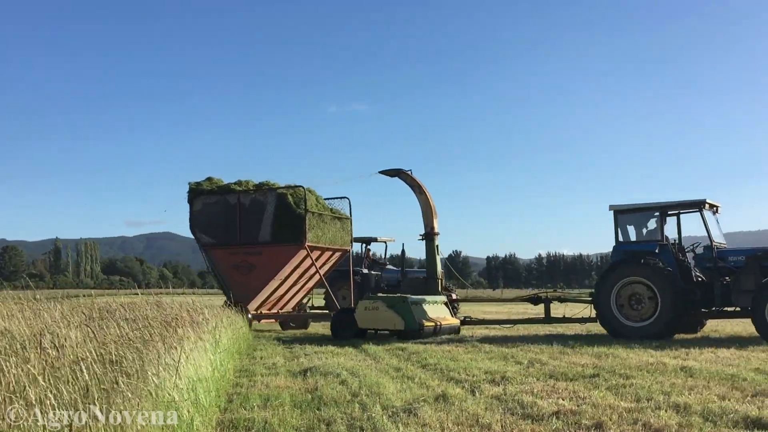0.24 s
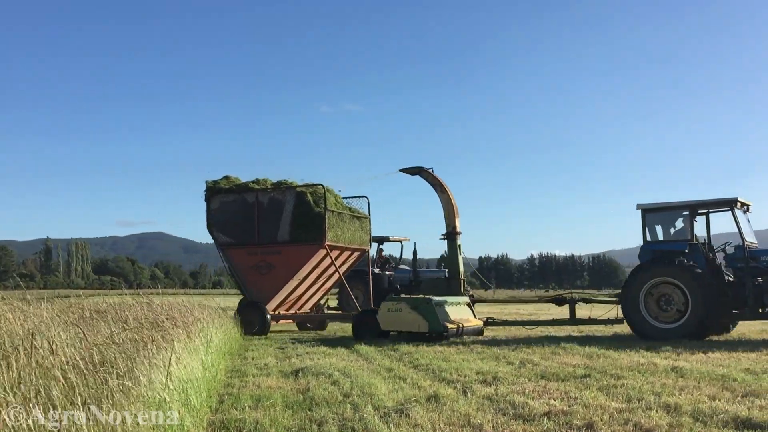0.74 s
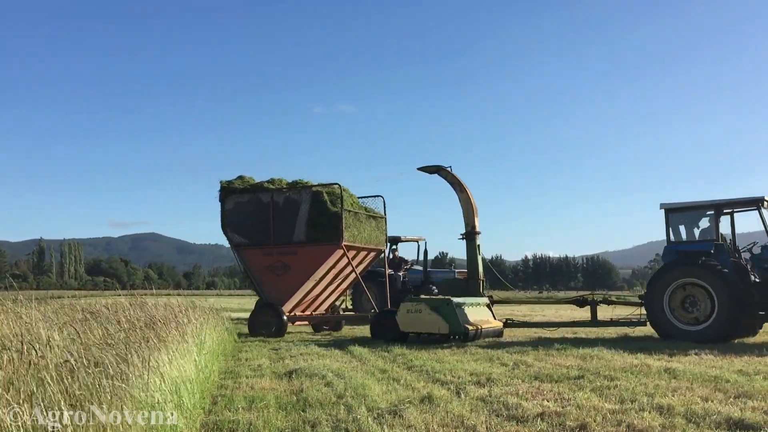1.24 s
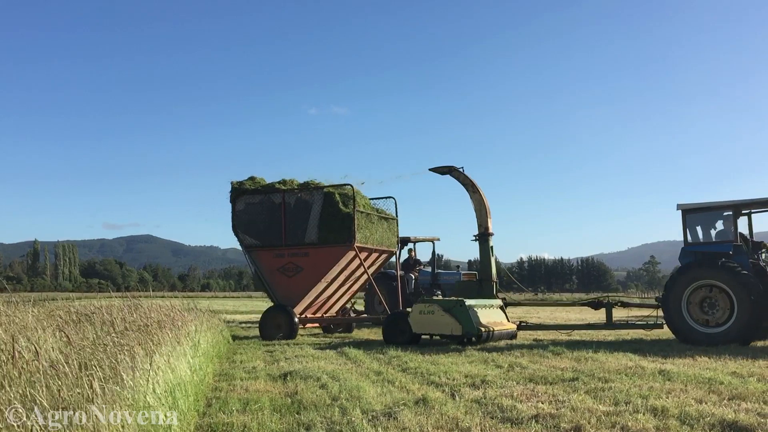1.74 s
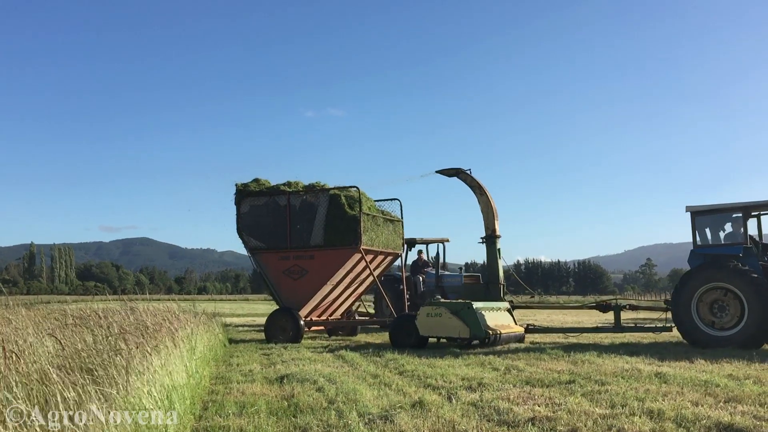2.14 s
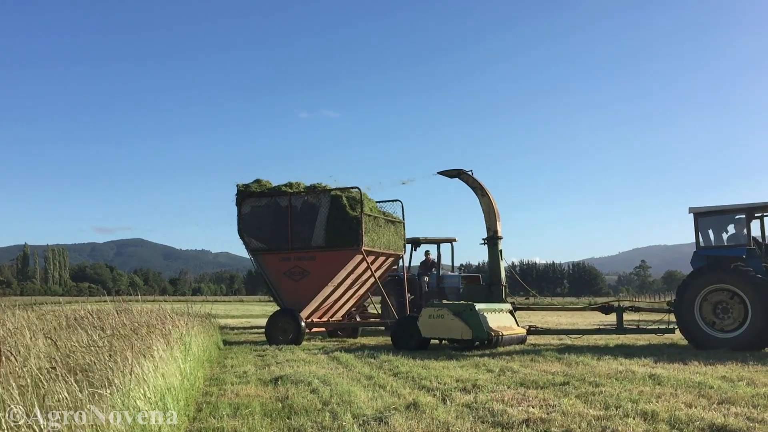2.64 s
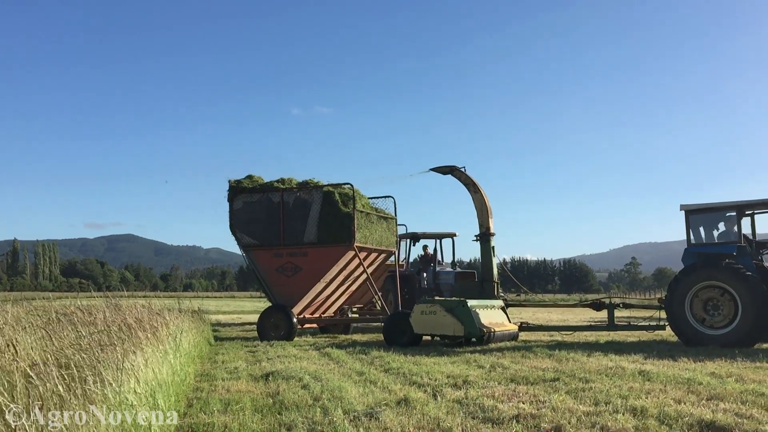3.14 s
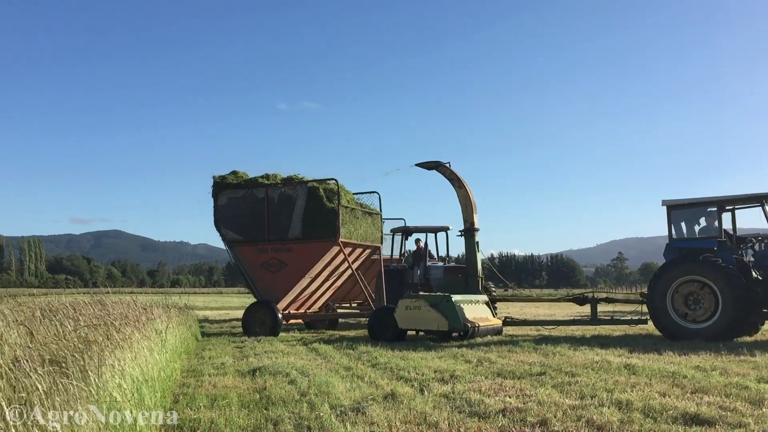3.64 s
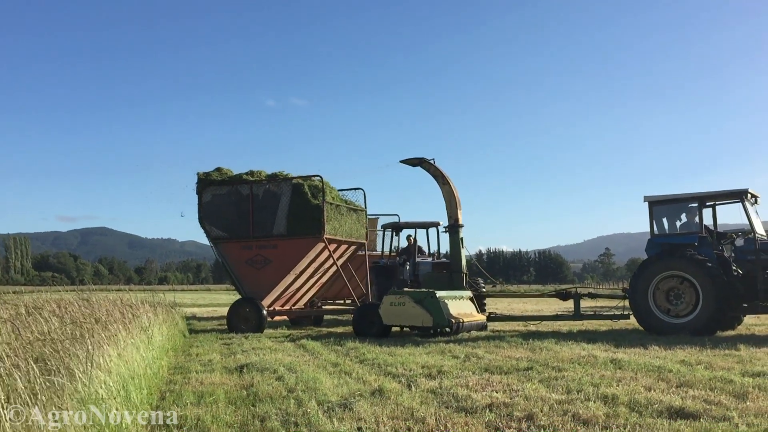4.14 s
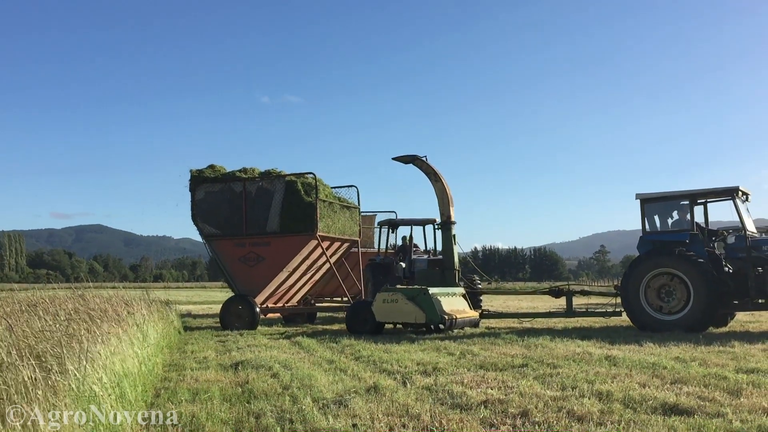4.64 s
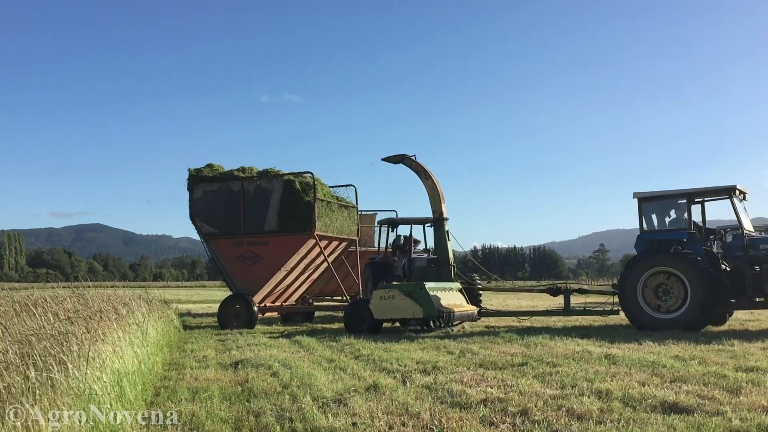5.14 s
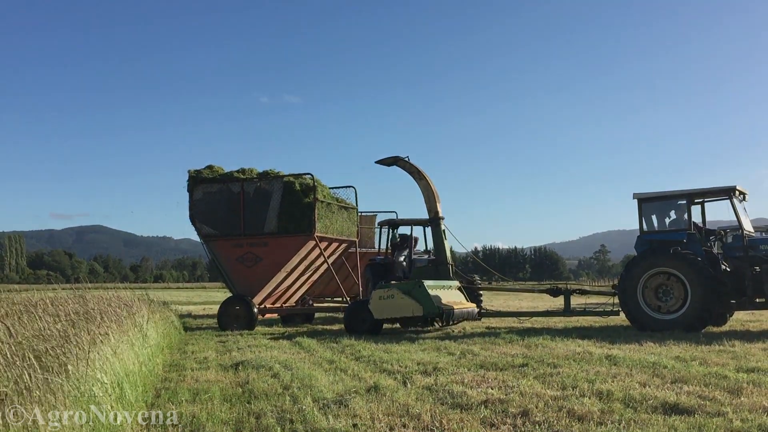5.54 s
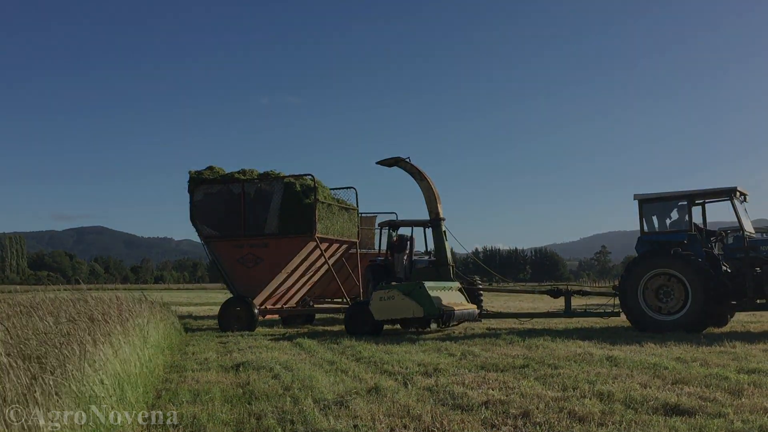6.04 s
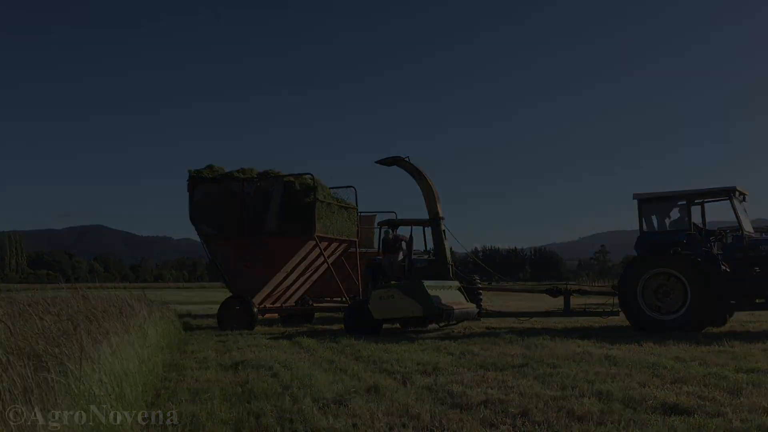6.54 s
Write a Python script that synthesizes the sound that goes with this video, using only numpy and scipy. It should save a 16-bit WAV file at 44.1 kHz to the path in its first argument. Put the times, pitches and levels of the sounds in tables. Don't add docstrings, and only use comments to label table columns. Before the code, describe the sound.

Deep whirring harvester drone over a tractor engine, rushing blower and metallic clatter; the drive eases, pitch sinks, grass crackle thins, wind buffets.

```python
import sys
import numpy as np
from scipy import signal
from scipy.fft import rfft, irfft
from scipy.io import wavfile
from scipy.ndimage import uniform_filter1d

SR = 44100
rng = np.random.default_rng(int(sys.argv[2]) if len(sys.argv) > 2 else 0)


def to_wav(sig):
    pcm = np.clip(np.atleast_2d(sig), -1, 1) * 32767
    pcm = np.round(pcm).astype(np.int16)
    wavfile.write(sys.argv[1], SR, pcm.T)


def volts_from_db(level):
    exponent = np.asarray(level, float) / 20
    return 10 ** exponent


N = 300305
T = np.arange(N) / SR
EASED_S = 2.15


def curves(table):
    s, *columns = np.transpose(table)
    return [np.interp(T, s, column) for column in columns]


def unit(x):
    return x / np.sqrt(np.mean(x ** 2))


def colour(x, points):
    hz, db = np.transpose(points)
    f = np.fft.rfftfreq(N, 1 / SR) + 1
    outside = np.minimum(np.minimum(f / hz[0], hz[-1] / f), 1) ** 3
    inside = volts_from_db(np.interp(np.log(f), np.log(hz), db))
    return unit(irfft(rfft(x) * inside * outside, N))


def ring(x, hz, width):
    b, a = signal.iirpeak(hz, hz / width, fs=SR)
    return signal.lfilter(b, a, x)


def walk(rate):
    hold = int(SR / rate)
    held = rng.standard_normal(4096)[np.arange(N) // hold]
    return unit(uniform_filter1d(uniform_filter1d(held, hold), hold))


def turns(hz, wobble):
    return 2 * np.pi * np.cumsum(hz * (1 + wobble * walk(29.82))) / SR


def tone(phase, db, flutter_db):
    return np.sqrt(2) * volts_from_db(db + flutter_db * walk(20)) * np.sin(phase)


def grains(rate, spread_db, tail_s):
    chance, size = rng.random((2, N))
    clicks = (chance < rate / SR) * volts_from_db(-spread_db * np.log(size + .01))
    return unit(signal.lfilter([1], [1, -np.exp(-1 / (tail_s * SR))], clicks))


def swells(rows):
    return sum(height * np.exp(-.5 * ((T - s) / length) ** 2) for s, height, length in rows)


def loud_swells(rows):
    return swells([(s, volts_from_db(db), length) for s, db, length in rows])


def after(s, rise_s):
    return np.clip((T - s) / rise_s, 0, 1)


def flywheel(away_db):
    # blade_hz, first_db, second_db, third_db
    housing = [(90.9, -15.5, -22, -34), (93, -14.5, -19, -36), (100.3, -14, -18, -42),
               (99.5, -14, -19.5, -46), (106.5, -15, -18.5, -44.5), (111.2, -18, -20, -45),
               (114.5, -25.5, -21, -44.5)]
    # blade_hz, lag_rad
    trailing = [(90, 4.6), (94, 4.6), (98.5, 3.9), (106.5, 2.6), (111, 1.5), (113.5, .3)]
    # level_db, loss_per_db (dB lost per dB of distance), idle_db (change once unloaded)
    overtones = [
        (-39.5, 1.6, 0.8),
        (-43, 0.3, -8.5),
        (-41, 1.1, -7.5),
        (-41.5, 2.1, -1),
    ]
    # start_s (peak), share_lost (0-1), length_s
    dips = [
        (2.712, 0.76, 0.0098),
        (2.75, 1, 0.0061),
        (5.59, 0.43, 0.0076),
        (5.985, 0.34, .007),
        (6.018, 0.46, .008),
    ]

    blade_hz, coast_hz, coast_s = 113.68, 71.84, 5.6
    coasting = np.maximum(T - EASED_S, 0)
    hz = coast_hz + (blade_hz - coast_hz) * np.exp(-coasting / coast_s)
    rate, *response = np.transpose(housing)
    first_db, second_db, third_db = (np.interp(hz, rate, r) for r in response)
    lag = np.interp(hz, *np.transpose(trailing))
    phase = turns(hz, wobble=0.002)

    beat_hz, beat_top_s, beat_dies_s = 3.15, 0.896, 1
    beat_phase = phase + 2 * np.pi * beat_hz * (T - beat_top_s)
    beat = np.exp(-coasting / beat_dies_s) * tone(beat_phase, -31.5, flutter_db=-2.0)
    drone = tone(phase, first_db, flutter_db=0.45) + beat
    drone = drone + tone(2 * phase - lag, second_db, flutter_db=0.53)

    unloaded = after(EASED_S, 0.99)
    levels = [third_db]
    for db, loss, idle_db in overtones:
        levels.append(db + loss * away_db + idle_db * unloaded)
    for order, db in zip((3, 4, 5, 6, 8), levels):
        blur = .07 * order * walk(12)
        drone = drone + tone(order * phase + blur, db, flutter_db=3.2)
    return drone * np.clip(1 - swells(dips), 0, 1), phase


def engine():
    # start_s, firing_hz, level_db
    firings = [
        (0, 68.4, -28),
        (1, 69.4, -30),
        (1.95, 70.6, -26.5),
        (2.3, 67.96, -42),
        (3, 67.6, -44),
        (6.81, 61.7, -39),
    ]
    hz, db = curves(firings)
    return tone(turns(hz, wobble=0.0061), db, flutter_db=0.0)


def blower(db):
    # pitch_hz, level_db (per Hz)
    roar = [(440, -0.5), (750, -3), (865, -0.5), (1310, 2), (1690, 2), (1930, -1), (2510, -6.5),
            (2800, -5.5), (3360, -6), (5000, -22), (6500, -27), (11000, -120)]
    # pitch_hz, width_hz, level_db
    chute_rings = [(940, 54, -0.5), (1124, 54, -0.5), (1291, 30, 6), (1605, 120, 0.5), (1663, 95, 6.5),
                   (2314, 31, -4), (3236, 240, -4.5)]
    air = colour(rng.standard_normal(N), roar)
    chute = 0
    for hz, width, ring_db in chute_rings:
        ringing = ring(rng.standard_normal(N), hz, width) / np.sqrt(width)
        chute = chute + volts_from_db(ring_db + 4.1 * walk(3.37)) * ringing
    return volts_from_db(db + 0.32 * walk(12)) * unit(air + volts_from_db(-10.5) * unit(chute))


def rumble(db):
    # pitch_hz, level_db (per Hz)
    low_bed = [(35, -24), (60, 2), (150, 7.5), (200, 9), (270, 4), (330, -3.5), (400, -2.5), (520, -16),
               (650, -12), (800, -40)]
    return volts_from_db(db + 8.0 + 0.5 * walk(12)) * colour(rng.standard_normal(N), low_bed)


def clatter(db, blades):
    # pitch_hz, level_db (per Hz)
    metal = [(2500, -8), (4000, -2), (5000, -6.5), (7000, -9.5), (8000, -13.5), (10000, -16.5),
             (12700, -19), (13600, -24)]
    puff = 1 + 0.16 * np.cos(blades + 1.6) * (1 + 0.36 * walk(14))
    knocks = 1.16 + 0.32 * grains(rate=180, spread_db=4.0, tail_s=0.0025)
    noise = rng.standard_normal(N) * puff * knocks
    return volts_from_db(db + 3.0 + 0.79 * walk(40)) * colour(noise, metal)


def feed():
    # start_s (peak), level_db, length_s
    flurries = [(0.132, -60, .07), (.55, -54.5, 0.05), (.73, -52, .07), (.97, -58, 0.094), (1.45, -59, .08),
                (2.182, -61, 0.081), (2.495, -63.5, .15), (2.71, -62, .04), (2.86, -60, 0.042),
                (3.3, -66, .08), (3.8, -61, .07), (4.17, -65, .07), (4.75, -68, .18), (5.38, -70, .08),
                (6.508, -71, 0.09)]
    last_feed_s, thins_db_per_s = 2.94, 11
    thinning_db = thins_db_per_s * np.maximum(T - last_feed_s, 0)
    steady_db = -53 - 3 * after(last_feed_s, .04) - thinning_db
    return 20 * np.log10(volts_from_db(steady_db) + loud_swells(flurries))


def grass(db):
    # pitch_hz, level_db (per Hz)
    stalks = [(4000, -15), (7000, 1.5), (10000, -1.5), (12000, -3.5), (14500, -3.5), (16000, 0)]
    snaps = grains(rate=330, spread_db=2.5, tail_s=0.00053)
    crackle = rng.standard_normal(N) * (0.96 + 0.59 * snaps)
    return volts_from_db(db + 5.5 + 0.69 * walk(40.2)) * colour(crackle, stalks)


def wind():
    # start_s (peak), level_db, length_s
    gusts = [(0, -35, .06), (.33, -34, .07), (.66, -32, .03), (.8, -32, 0.045), (1.03, -42, .05),
             (1.36, -38, 0.054), (1.599, -33, 0.1), (2.2, -29, 0.11), (2.515, -27, 0.055),
             (2.74, -24, 0.065), (2.98, -26, 0.067), (3.18, -32, .06), (3.32, -23, .035), (3.75, -36, .3),
             (4.15, -30, 0.073), (4.395, -29, .11), (4.66, -27, .025), (4.88, -30, .07), (5.08, -26, 0.063),
             (5.643, -19, 0.042), (5.822, -30, .05), (5.994, -26, 0.058), (6.14, -26, 0.072),
             (6.468, -27, 0.047), (6.66, -26, 0.095)]
    # start_s, level_db, pitch_hz (where the fall ends)
    thumps = [(2.248, -22, 198), (2.6935, -8, 161), (2.711, -26, 200), (2.746, -26, 203), (3.197, -31, 180),
              (4.268, -11, 147), (4.85, -27, 151), (5.584, -23, 180), (5.642, -29, 200),
              (5.659, -22.5, 288), (5.692, -26, 181), (5.993, -20, 160), (6.012, -21.5, 160)]
    low_air = [(30, -11), (55, 3.5), (75, 3.5), (100, 0.5), (140, -2), (250, -16.0), (500, -73)]  # Hz, dB
    flutter = colour(rng.standard_normal(N), low_air)
    calm = volts_from_db(-40 + 3 * walk(6.4))
    out = (calm + loud_swells(gusts)) * volts_from_db(1.5 + 2.0 * walk(15)) * flutter
    t = np.arange(800) / SR
    swell = ((t / .004) * np.exp(1 - t / .004)) ** 1.5
    for s, db, hz in thumps:
        falling = 2 * np.pi * np.cumsum(hz * (1 + 4 * np.exp(-t / .003))) / SR
        start = int(s * SR)
        out[start:start + 800] += volts_from_db(db) * swell * np.sin(falling)
    return out


def ticks():
    # start_s, level_db, pitch_hz (ring)
    clicks = [(0.1231, -24, 6690), (0.5926, -29, 6490), (0.7303, -25, 7350), (0.839, -23, 6260),
              (0.8739, -20, 7070), (1.3603, -31, 7170), (1.6237, -28, 6900), (2.1844, -26, 6390),
              (2.2098, -23, 7280), (2.4249, -44, 6450), (2.4438, -29, 6047), (2.5296, -31, 7230),
              (2.6557, -29, 8420), (3.5732, -37, 6480), (3.5971, -30, 6610), (3.7633, -31, 6150),
              (3.8396, -41, 6010), (3.9492, -38, 6110), (4.0357, -36, 6386), (4.0662, -39, 6510),
              (4.1839, -40, 6360), (4.2217, -29, 6126), (4.2517, -28, 6070), (4.367, -38, 6645),
              (4.3974, -40, 6250), (4.4882, -30, 6676), (4.7252, -28, 6370), (4.7661, -29, 6540),
              (5.0617, -37, 7330), (5.4091, -47, 6200)]
    out = np.zeros(N + 400)
    t = np.arange(400) / SR
    for s, db, hz in clicks:
        crack = ring(rng.standard_normal(400), hz, 3500) * 1.1
        crack = crack + .5 * np.sin(2 * np.pi * hz * t)
        start = int(s * SR)
        out[start:start + 400] += volts_from_db(db - 4.5) * np.exp(-t / .0015) * crack
    high_pass = signal.butter(2, 4000, "high", fs=SR, output="sos")
    return signal.sosfilt(high_pass, out[:N])


def gear_whine():
    # start_s, pitch_hz, level_db
    gear = [
        (4.6, 1117, -60),
        (4.8, 1115, -42),
        (5.7, 1108, -43),
        (5.9, 1105, -65),
    ]
    hz, db = curves(gear)
    return tone(turns(hz, wobble=0.0017), db, flutter_db=0.5)


def scene():
    recede_s = 2.98
    away_db = -20 * np.log10(np.hypot(1, T / recede_s))
    drone, blades = flywheel(away_db)
    machine = drone + engine() + blower(-24.5 + away_db)
    machine = machine + rumble(-32 + 0.88 * away_db)
    machine = machine + clatter(-42 + 1.44 * away_db, blades)
    return (machine + grass(feed()) + wind() + ticks() + gear_whine())[None]


def band_limit(x):
    return signal.sosfilt(signal.butter(12, 16570, fs=SR, output="sos"), x)


def record(dry):
    bass_cut = signal.butter(2, 35, "high", fs=SR, output="sos")
    cut = signal.sosfilt(bass_cut, dry)
    port = cut - .5 * ring(cut, 10400, 700)
    soft = np.tanh(.5 * port) / .5
    faded = soft * (1 - after(5.7, 2.7))
    below_top = np.fft.rfftfreq(N, 1 / SR) < 15730
    mix = irfft(rfft(faded) * below_top, N)
    return band_limit(mix)


dry = scene()
out = record(dry)
to_wav(out)
```